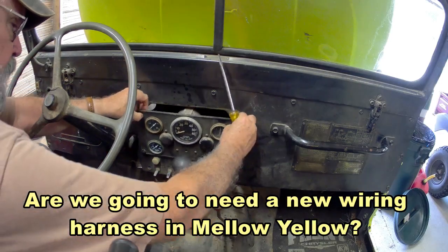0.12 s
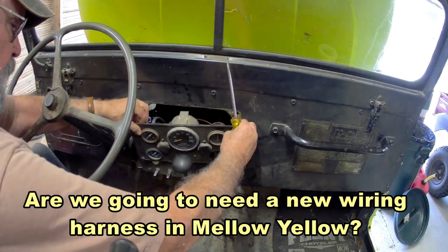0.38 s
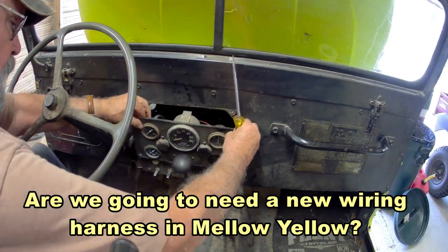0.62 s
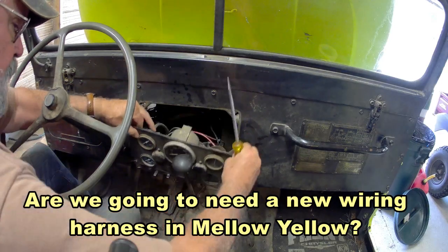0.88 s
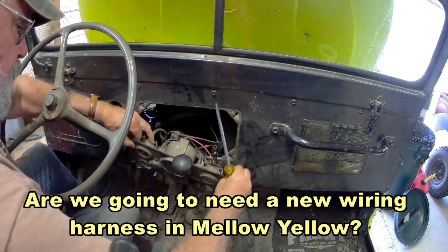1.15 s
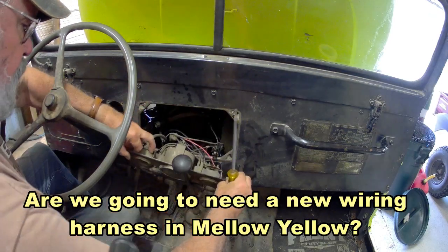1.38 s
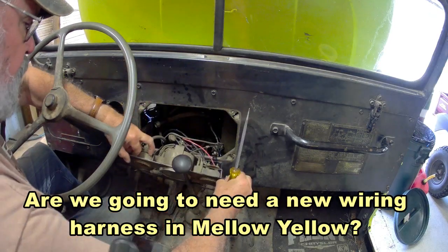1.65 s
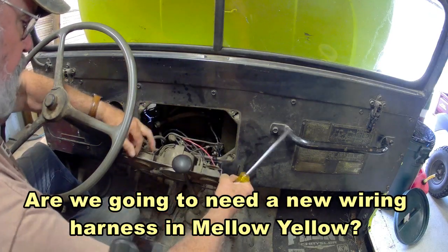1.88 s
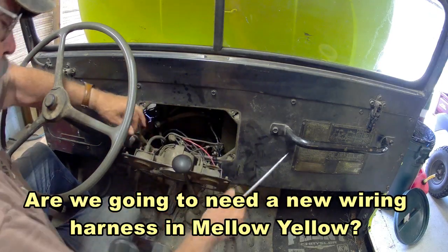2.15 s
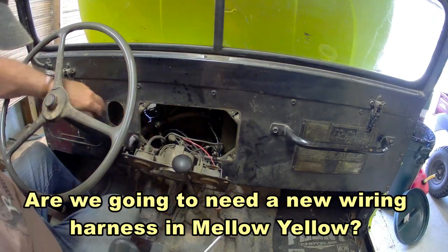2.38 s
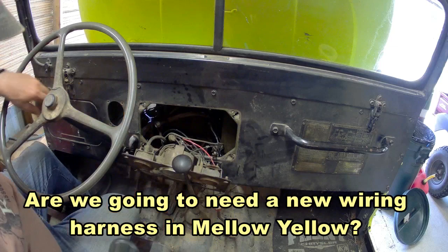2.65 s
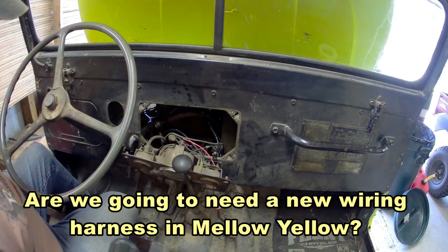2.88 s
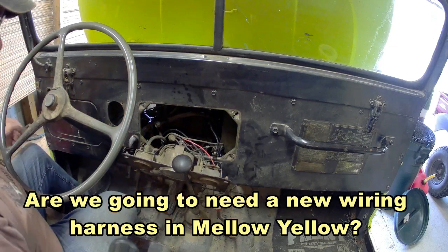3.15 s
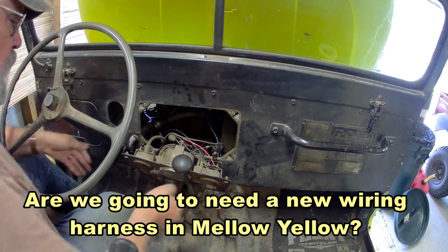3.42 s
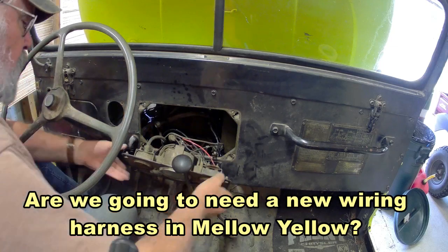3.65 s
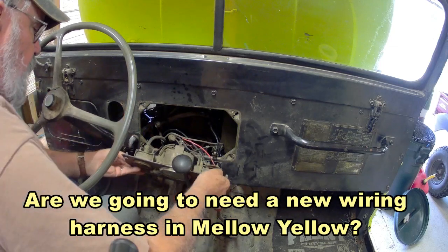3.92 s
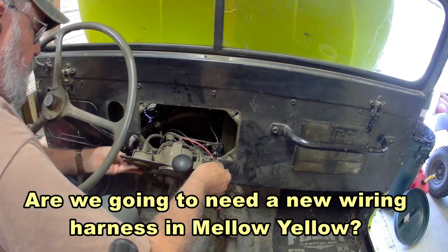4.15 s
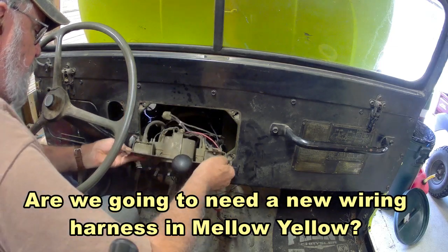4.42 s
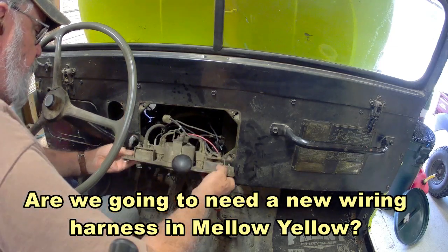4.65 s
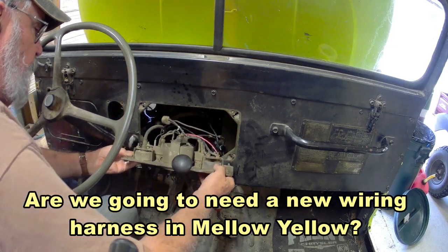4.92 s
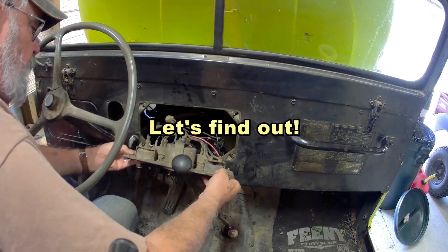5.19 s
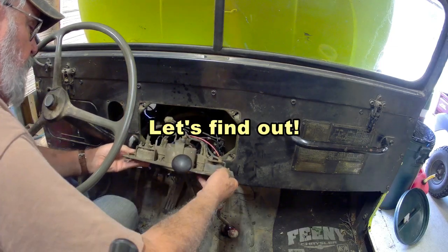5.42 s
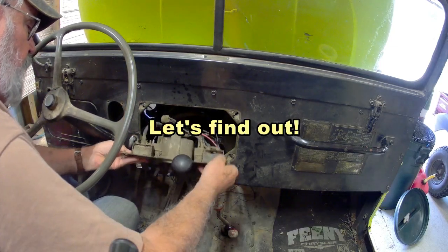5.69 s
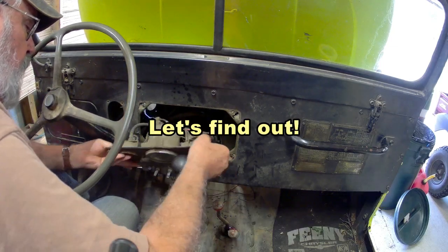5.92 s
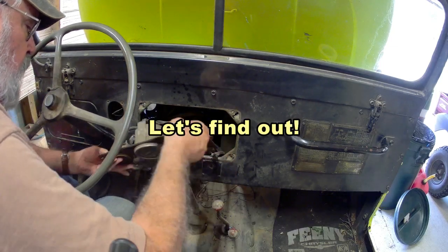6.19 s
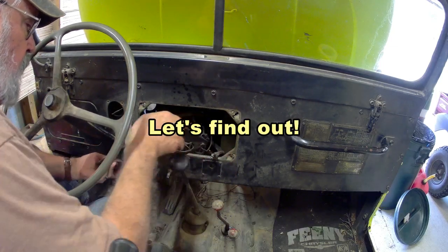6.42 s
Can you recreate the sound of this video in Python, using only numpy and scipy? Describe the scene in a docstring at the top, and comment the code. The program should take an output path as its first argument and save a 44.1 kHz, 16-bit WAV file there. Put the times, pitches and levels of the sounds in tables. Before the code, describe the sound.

Close inside a vehicle cab in a garage: a firm metallic knock and rub as a panel comes free, loose parts chattering, a tiny high ping, then near quiet. A tool hits the metal floor, tumbling in hard, boomy clanks with bright rattle. It settles into ticks, two lighter groups of thumps and handling rubs, a quiet gap, and finally a dull short slide. Faint hum underneath throughout.

```python
"""A steel dash panel is worked loose in a vehicle cab inside a garage.
Still air and a distant machine hum (shaped noise, wavering tones) last throughout. From 0.4 s hands and
wires rub (friction noise), loose parts rattle, and knocks and ticks ring the metal (damped modes) with
garage echoes; a small part pings at 0.9 s. At 2.8 s a hand tool drops on the sheet-metal floor, bounces
and rattles; more rubs and blows follow, and from 6.1 s the panel's edge slides along the dash."""
import sys
import numpy as np
from scipy import signal
from scipy.fft import rfft, irfft
from scipy.io import wavfile
from scipy.ndimage import uniform_filter1d

SR = 44100
rng = np.random.default_rng(int(sys.argv[2]) if len(sys.argv) > 2 else 0)


def voltage_ratio(decibels):
    """Convert decibels (scalar or array-like) to amplitude ratios, 20 dB per decade."""
    exponent = np.asarray(decibels, float) / 20
    return 10 ** exponent


def inscribe(sig):
    """Save sig as 16-bit PCM at rate SR to the path in sys.argv[1].

    A 1-D sig is mono; a 2-D sig holds one channel per row.
    Samples are clipped to [-1, 1] before scaling.
    """
    pcm = np.round(np.clip(np.atleast_2d(sig).T, -1, 1) * 32767)
    wavfile.write(sys.argv[1], SR, pcm.astype(np.int16))


N = 289296


def evened(x):
    """Normalisation: scales a signal to rms 1."""
    return x / np.sqrt(np.mean(x ** 2) + 1e-20)


def read(points, hz):
    """Linear interpolation of a table on a logarithmic frequency axis."""
    f, value = np.transpose(points)
    return np.interp(np.log(hz + 1), np.log(f + 1), value)


def add(mix, s, sound):
    """Superposition: adds a sound to the mix from time s."""
    part = mix[round(s * SR):][:len(sound)]
    part += sound[:len(part)]


def noise(level_db, size):
    """Spectral shaping: Gaussian noise whose short-time spectrum follows level_db(hz, s)."""
    hop = size // 4
    frames = N // hop + 5
    hz = np.fft.rfftfreq(size, 1 / SR)
    real, imaginary = rng.standard_normal((2, len(hz), frames))
    spectrum = (real + 1j * imaginary) * voltage_ratio(level_db(hz[:, None], np.arange(frames) * hop / SR))
    return signal.istft(spectrum, nperseg=size, noverlap=size - hop)[1][:N] / np.sqrt(size)


def ring(modes, t, strength, turns):
    """Modal superposition: exponentially damped sines, each with its own start phase in turns."""
    hz, db, t60 = np.transpose(modes)[:, :, None]
    dying = strength[:, None] * voltage_ratio(db - 60 * t / np.maximum(t60, .005))
    return (dying * np.sin(2 * np.pi * (hz * t + turns[:, None]))).sum(0)


# relative noise spectrum of the still air: f/Hz, level/dB per Hz
AIR_COLOUR = [(12, -39.5), (20, -11.5), (49, -12), (70, -1.5), (85, -14.5), (171, -5.5), (202, -18),
              (282, -10), (325, -20.5), (363, -15), (507, -19.5), (1380, -22.5), (15600, -46.5)]


def air():
    """Stationary broadband noise: still garage air under a faint, slow level swell."""
    rates_hz = np.geomspace(.3, 5, 12)

    def swell(t):
        return sum(np.sin(2 * np.pi * (f * t + rng.random())) / np.sqrt(f) for f in rates_hz)

    def level_db(hz, t):
        return read(AIR_COLOUR, hz) + 0.18 * swell(t)

    return voltage_ratio(-52.5) * evened(noise(level_db, size=2048))


# tones of the distant machine: f/Hz, peak level/dB, width/Hz (the rms wander is 0.3 of it)
HUM_TONES = [(58.5, -53.5, 8), (171, -59.5, 7.1), (297, -68, 8.7)]


def hum():
    """Frequency and amplitude modulation: sines of a far machine waver slowly about their means."""
    out = np.zeros(N)
    for hz, db, width in HUM_TONES:
        drift = evened(uniform_filter1d(rng.standard_normal(N), size=SR // 10))
        cycles = np.cumsum(hz + .3 * width * drift[::-1]) / SR
        out += voltage_ratio(db + 0.59 * drift) * np.sin(2 * np.pi * cycles)
    return out


def pressure(stroke, t):
    """Two-stage decay: a stroke is pressed in, held, let go quickly; loose wires and parts settle slowly."""
    LET_GO_DB_PER_S, SETTLE_DB = 150, -13  # the settling part starts this much lower
    s, rise, held, db, t60 = stroke
    after = np.maximum(t - s - rise - held, 0)
    fall = voltage_ratio(-LET_GO_DB_PER_S * after) + voltage_ratio(SETTLE_DB - 60 * after / t60)
    return np.clip((t - s) / max(rise, .001), 0, 1) * voltage_ratio(db) * fall


def friction(strokes, colour, tilt_db_per_octave, tilt_change_per_s):
    """Stick-slip noise: it catches unevenly, and its tilt about 1 kHz drifts for 0.5 s of each stroke."""
    def level_db(hz, t):
        octaves = np.log2((hz + 50) / 1000)
        gain = 0
        for stroke in strokes:
            tilt = tilt_db_per_octave + tilt_change_per_s * np.clip(t - stroke[0], 0, .5)
            gain = gain + pressure(stroke, t) * voltage_ratio(tilt * octaves)
        catches = evened(uniform_filter1d(rng.standard_normal(len(t)), size=8))
        grit = uniform_filter1d(rng.standard_normal((len(hz), len(t))), size=12, axis=0)
        grit = evened(uniform_filter1d(grit, size=5, axis=1))  # brief grains
        rough_db = catches + 2.5 * grit * (hz > 1200)
        return read(colour, hz) + 20 * np.log10(gain + 1e-9) + rough_db
    return noise(level_db, size=256)


# strokes of hands, wires and edges, also shaking the rattle:
# start t/s, pressed in over t/s, held t/s, pressure level/dB before settling adds to it, settling t60/s
RUB_STROKES = [(.405, .003, .07, -12.5, 2.1), (1.02, .07, .03, -32, .9), (3.173, .003, .05, -19, 1.5),
               (3.23, .06, .14, -11.5, 6.1), (4.2, .03, .04, -29, .5), (4.35, .07, .03, -23, .5),
               (4.68, .003, .09, -20, .9), (4.9, .02, .03, -31, .6), (5.132, .003, .02, -21, .3),
               (5.15, .06, .02, -19, .4)]
# relative spectrum of the rubbing: f/Hz, level/dB per Hz
RUB_SPECTRUM = [(50, -18), (100, -5), (200, -3.5), (560, -4.5), (1500, -10), (4800, -21), (5500, -26.5),
                (15000, -40.5)]


def rubbing():
    """Sliding friction of hands, wires and edges along the metal, brightening within each stroke."""
    return friction(RUB_STROKES, RUB_SPECTRUM, tilt_db_per_octave=-1.2, tilt_change_per_s=1.5)


def rattle():
    """Random impact process: chance contacts of loose parts, as strong as the rubbing that shakes them."""
    CONTACTS_PER_S, LEVEL_DB, SCATTER_DB = 90, -30, 2.6  # level relative to the pressure
    t = np.arange(N) / SR
    centres_hz = np.geomspace(1800, 4600, 8)
    happens = rng.random(N) < CONTACTS_PER_S / SR
    size = voltage_ratio(LEVEL_DB + SCATTER_DB * np.minimum(rng.exponential(1, N), 3)) * happens
    size = size * sum(pressure(stroke, t) for stroke in RUB_STROKES)
    kind = rng.integers(0, len(centres_hz), N)
    out = np.zeros(N)
    for k, hz in enumerate(centres_hz):
        out += signal.oaconvolve(size * (kind == k), blow(hz, .6, seconds=.1))[:N]
    return out


# modes of the ringing sheet metal: f/Hz, level/dB, t60/s
SHEET_MODES = [(100.3, 9, 0.1), (199, 5.5, 0.16), (294, -7.5, .1), (367.5, 0.5, 0.07), (419, 1.5, 0.42),
               (528.3, 0.5, 0.26), (660, 6.5, 0.07), (823, -1, 0.095), (893, -1, 0.069), (1054, -10.5, 0.1),
               (1269, 4.5, 0.081), (1440.5, 5, 0.18), (1753, -4.5, .1), (2744, 1.5, 0.11), (3525, 6, 0.034),
               (3900, 2.5, .1), (4500, 0.5, 0.2), (5330, -10.5, 0.045), (6690, 2.5, 0.15), (7470, 5, 0.041)]
# how strongly metal and microphone pass a blow: f/Hz, level/dB
PASS_RESPONSE = [(55, -32), (90, 4), (1500, 1.5), (4000, -3), (6000, -7.5), (9000, -14.5), (15000, -20)]


def blow(centre_hz, spread, seconds):
    """Modal excitation: rings the modes near the centre plus an unresolved crowd; peak 2.3 ms rms is 1."""
    KNOCK_T60_S, KNEE_HZ, SHORTENING = .115, 1100, .97  # t60 well below the knee, steepness above it
    n = round(seconds * SR)
    t = np.arange(n) / SR

    def near(f):
        distance = np.log2(f / centre_hz) / max(spread, .1)
        return voltage_ratio(read(PASS_RESPONSE, f)) / (1 + distance ** 4)

    turns = rng.standard_normal(len(SHEET_MODES)) * min(centre_hz / 3000, 1)  # dull blows start nearly in step
    modes = ring(SHEET_MODES, t, near(np.array(SHEET_MODES)[:, 0]), turns)
    hz = np.fft.rfftfreq(2 * n, 1 / SR) + 1
    crowd = evened(irfft(rfft(rng.standard_normal(n), 2 * n) * near(hz))[:n])
    t60 = KNOCK_T60_S / (1 + (centre_hz / KNEE_HZ) ** 2) ** (SHORTENING / 2)
    held = voltage_ratio(-60 * (t / t60) ** 1.33)  # chatters a moment, then contact damps it
    rise = 1 - np.exp(-t * centre_hz / .6)  # duller blows take longer to land
    sound = (modes / abs(modes).max() + 0.5 * crowd) * held * rise
    return sound / np.sqrt(np.max(uniform_filter1d(sound ** 2, size=100)))


# blows on sheet metal, dull knocks to bright ticks: t/s, peak short-term level/dB, centre f/Hz, spread/octaves
BLOW_EVENTS = [(.406, -22.5, 3020, .83), (.409, -26.5, 900, 1.26), (.412, -22.5, 108, .91),
               (.429, -22.5, 270, .41), (.456, -22.5, 675, .74), (.465, -31.5, 4300, .7),
               (.48, -26, 624, .9), (.542, -40, 2600, .8), (.568, -38, 3280, .65), (.66, -35.5, 590, 1.05),
               (.696, -33.5, 4000, 1.23), (.768, -36, 4000, .4), (.806, -39, 810, 1.1),
               (.94, -46, 1520, .21), (1.085, -45.5, 1600, .33), (1.12, -42.5, 198, 1.06),
               (1.312, -48.5, 900, 1.5), (1.9663, -50.5, 4500, .77), (2.703, -45, 2330, 1.05),
               (2.714, -49, 2280, .6), (2.726, -46.5, 2460, 1.1), (2.8228, -21, 2500, 1.8),
               (3.173, -22, 2600, .96), (3.174, -15, 470, 1.05), (3.2, -21.5, 854, .99),
               (3.227, -19, 1170, 1.57), (3.252, -14.5, 492, .64), (3.252, -20, 3900, .54),
               (3.263, -7, 664, 1.23), (3.264, -9.5, 4030, .65), (3.27, -9.5, 4800, .75),
               (3.3, -15, 1400, 1.1), (3.345, -20, 800, 1.5), (3.389, -18.5, 533, 1.2),
               (3.455, -18.5, 3500, .55), (3.485, -9.5, 532, .88), (3.512, -23.5, 4000, .65),
               (3.532, -13.5, 540, .76), (3.565, -16, 660, 1.11), (3.6, -27, 563, .7),
               (3.698, -23, 482, .91), (3.755, -18, 547, .51), (3.779, -32, 5500, 1.1),
               (3.79, -23.5, 620, 1.11), (3.796, -34.5, 3490, 1.05), (3.865, -42, 2440, .49),
               (3.932, -45, 4840, 1.2), (3.83, -35, 620, .7), (3.937, -30.5, 710, .45),
               (3.96, -35.5, 840, .6), (4.019, -31, 5000, .9), (4.085, -41.5, 2600, .88),
               (4.222, -44, 1500, .6), (4.414, -38, 2560, 1.23), (4.43, -36, 644, .75),
               (4.46, -37.5, 720, .72), (4.679, -31, 2520, 1.1), (4.691, -24.5, 196, .39),
               (4.712, -34.5, 2940, .88), (4.719, -29.5, 210, .79), (4.747, -25.5, 1370, 1.05),
               (4.75, -24, 222, 1.05), (4.91, -39.5, 696, .2), (4.93, -43, 696, .2),
               (5.131, -33, 3520, .85), (5.135, -32.5, 1390, .55), (5.18, -35.5, 2010, 1.1),
               (5.188, -26.5, 195, .72), (5.195, -34, 756, .77), (5.213, -35, 2900, 1.1),
               (5.23, -32, 296, .76), (5.673, -54, 4000, .33), (5.722, -56, 4000, .4),
               (5.775, -58, 4000, .3), (5.96, -46.5, 203, .47), (6.095, -36, 1060, .82),
               (6.28, -43, 3240, .46), (6.28, -36, 820, .88), (6.32, -42.5, 736, .42)]


def blows():
    """Impact excitation: each distinct blow sets the sheet metal ringing at its own moment."""
    out = np.zeros(N)
    for s, db, centre_hz, spread in BLOW_EVENTS:
        add(out, s, voltage_ratio(db) * blow(centre_hz, spread, seconds=.25))
    return out


# reverberation of the garage: f/Hz, t60/s
GARAGE_DECAY = [(100, 0.93), (300, 0.36), (1000, 0.43), (3000, 0.38), (6000, 0.28), (12000, 0.48)]


def garage(hits):
    """Reverberation: convolution with sparse echoes dying by band, in three tails that take turns."""
    t = np.arange(N) / SR
    tool_far_off = (t > 2.8) & (t < 3.77)
    sent = hits * voltage_ratio(np.where(tool_far_off, -2, -5))  # echo share in dB: less for the panel close by
    taps = np.zeros((3, SR))
    at = np.arange(300, SR - 20, 20) + rng.integers(0, 20, (3, (SR - 301) // 20))
    np.put_along_axis(taps, at, rng.choice([-1., 1.], at.shape), 1)
    hz, tap_s, z = signal.stft(taps, SR, nperseg=256)
    decay = voltage_ratio(-60 * tap_s / read(GARAGE_DECAY, hz)[:, None])
    tails = signal.istft(z * decay, SR, nperseg=256)[1]
    phase = np.arange(3)[:, None] * 2 * np.pi / 3
    turn = np.cos(40 * t + phase) * np.sqrt(2 / 3)  # squares sum to 1
    return signal.fftconvolve(sent * turn, tails / np.linalg.norm(tails[0]), axes=1).sum(0)[:N]


# a small loose part sings on: t/s, peak level/dB, f/Hz, t60/s, beats per s
PING_TONE = (.925, -63, 7100, .8, 11)


def ping():
    """Beating: a damped tone of a small loose part swells and fades under a sine envelope."""
    out, t = np.zeros(N), np.arange(SR // 2) / SR
    s, db, hz, t60, beat = PING_TONE
    add(out, s, voltage_ratio(db - 60 * t / t60) * np.sin(2 * np.pi * hz * t) * np.sin(np.pi * beat * t))
    return out


# the tool's first fall: t/s, level/dB scaling the shaft modes, shudder rms level/dB at first, shudder t60/s
TOOL_FALL = (2.8225, -17.5, -37, 0.5)
# modes of the tool's steel shaft: f/Hz, level/dB, t60/s
SHAFT_MODES = [(185, -5.5, 0.036), (335, -2.5, .03), (452, 3.5, 0.026), (530, -2.5, .04), (1332, 3, 0.029),
               (2130, -25.5, .02), (2600, 1, 0.025), (3630, -0.5, .02), (3950, 3.5, .02),
               (4620, 2.5, 0.016), (5700, -9.5, 0.02), (7200, -9.5, 0.013)]


def clank():
    """Modal ringing and re-excitation: the shaft is struck, then kept ringing as the floor shudders."""
    out, t = np.zeros(N), np.arange(SR // 2) / SR
    s, db, shudder_db, t60 = TOOL_FALL
    shaft = ring(SHAFT_MODES, t, np.ones(len(SHAFT_MODES)), rng.random(len(SHAFT_MODES)))
    shaft = shaft * (1 - np.exp(-t / 0.00033))
    rough = signal.fftconvolve(rng.standard_normal(len(t)), shaft * np.exp(-t / .002))[:len(t)]
    shudder = voltage_ratio(shudder_db - 60 * t / t60) * evened(rough) * (1 - np.exp(-t / .003))
    add(out, s, voltage_ratio(db) * shaft + shudder)
    return out


# strokes of the panel's edge along the dash:
# start t/s, pressed in over t/s, held t/s, pressure level/dB before settling adds to it, settling t60/s
SLIDE_STROKES = [(6.1, .003, .01, -34, 3.1), (6.285, .003, .05, -31, .9), (6.36, .08, .2, -26, .9)]
# relative spectrum of the sliding: f/Hz, level/dB per Hz
SLIDE_SPECTRUM = [(380, -34), (560, 3), (1000, -3.5), (1800, -13.5), (2300, -22), (4500, -25.5),
                  (9000, -47)]


def edge_slide():
    """Sliding friction of the panel's edge, growing duller within each stroke."""
    return friction(SLIDE_STROKES, SLIDE_SPECTRUM, tilt_db_per_octave=2.5, tilt_change_per_s=-15.5)


def scene():
    """Superposition: impacts with their reverberation, friction, and the steady background."""
    background = air() + hum()
    rubs = rubbing() + edge_slide()
    hits = rattle() + blows() + ping() + clank()
    return (background + rubs + hits + garage(hits))[None]


def roll_off(x):
    """The treble ends steeply here."""
    return signal.sosfilt(signal.butter(12, 15780, fs=SR, output="sos"), x)


def record(dry):
    """Saturation and high-pass filtering: the loudest peaks round off, the deepest bass is cut."""
    CEILING = .7  # of full scale
    rounded = dry / (1 + abs(dry / CEILING) ** 4) ** (1 / 4)
    high_pass = signal.butter(2, 30, "high", fs=SR, output="sos")
    mix = signal.sosfilt(high_pass, rounded)
    return roll_off(mix)


dry = scene()
out = record(dry)
inscribe(out)
```